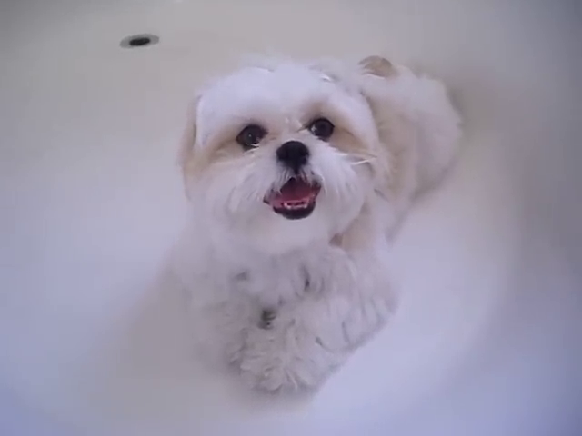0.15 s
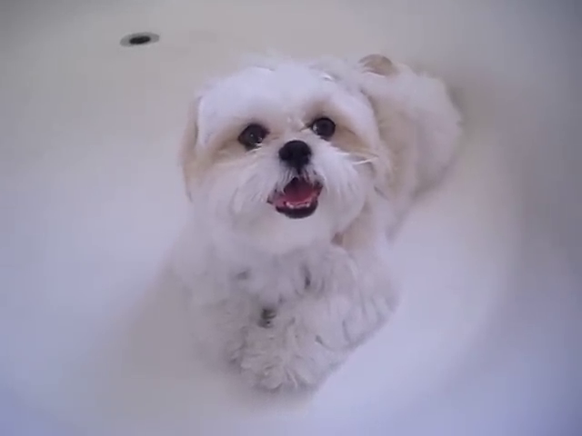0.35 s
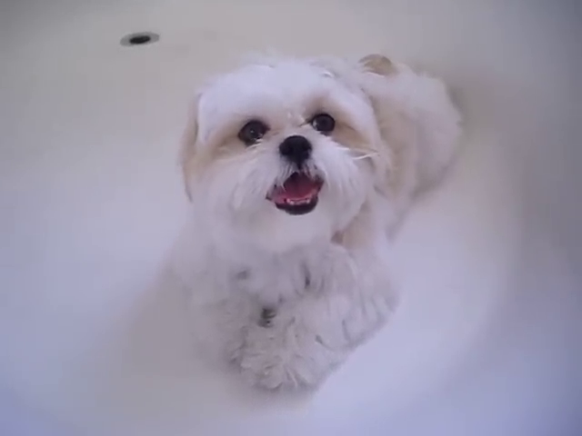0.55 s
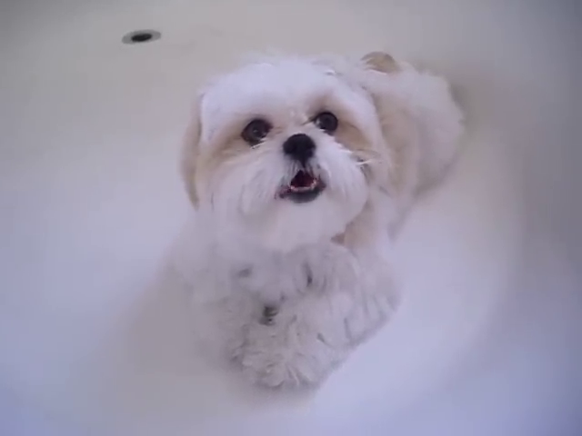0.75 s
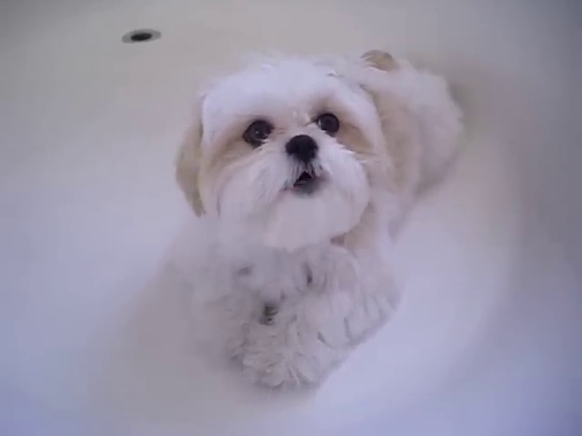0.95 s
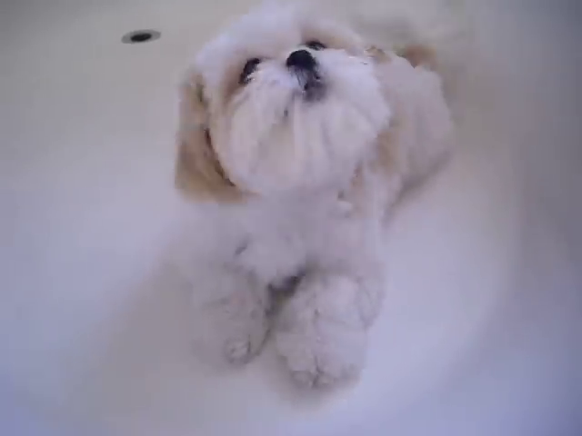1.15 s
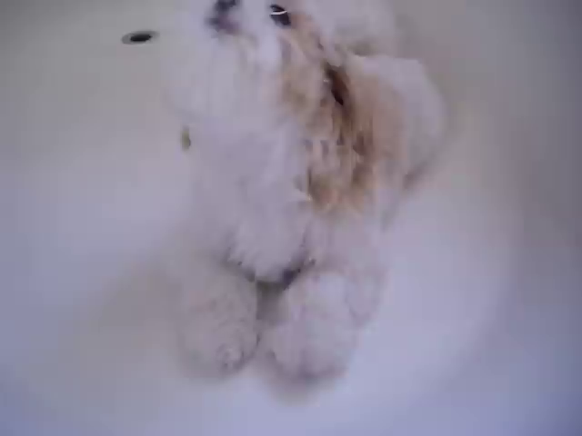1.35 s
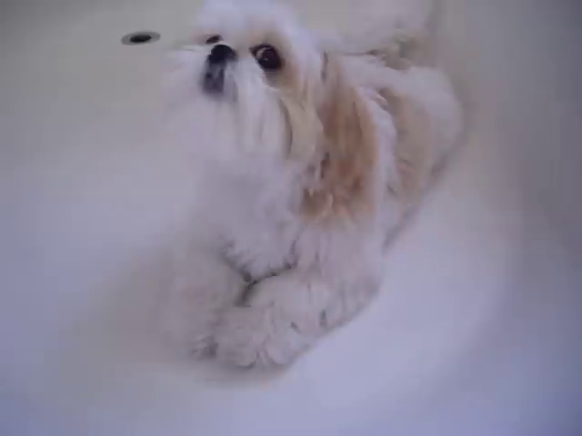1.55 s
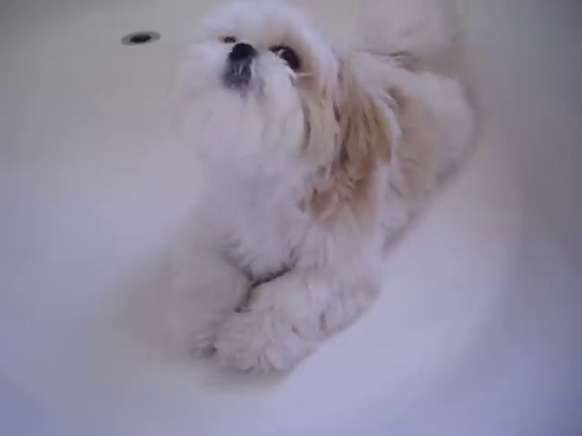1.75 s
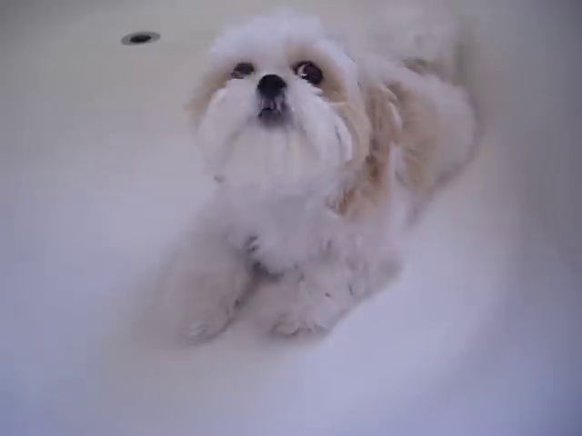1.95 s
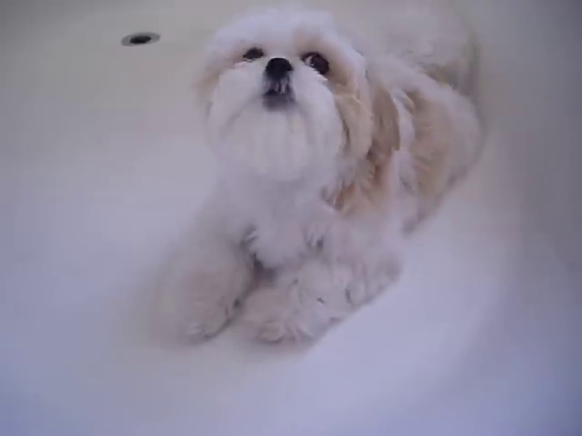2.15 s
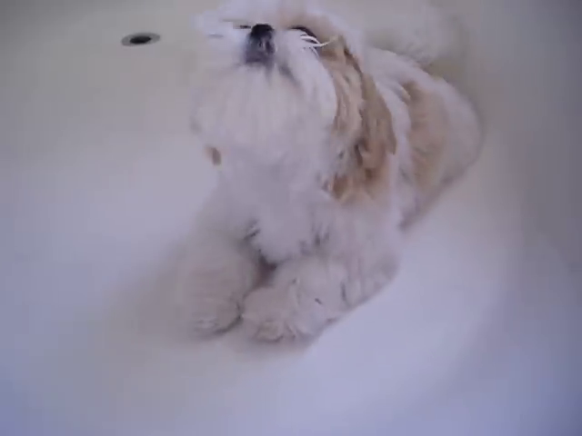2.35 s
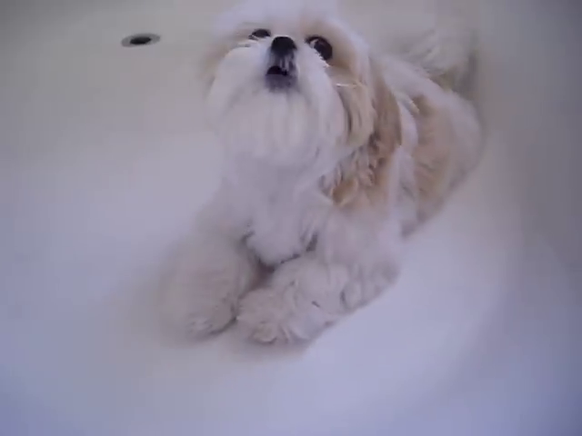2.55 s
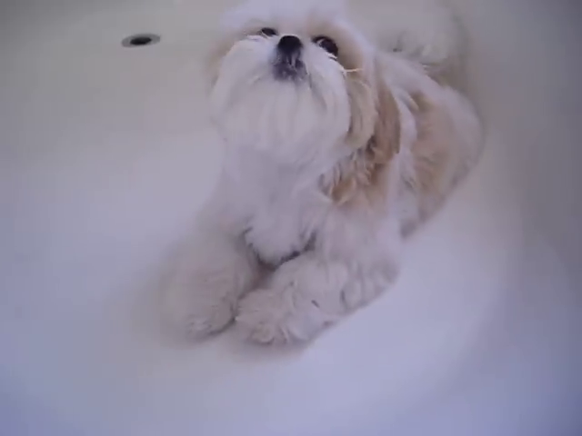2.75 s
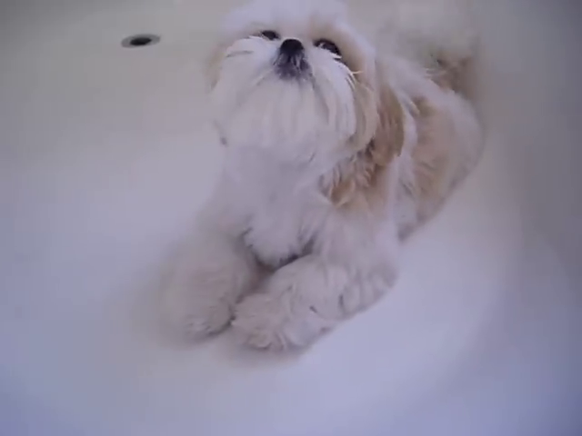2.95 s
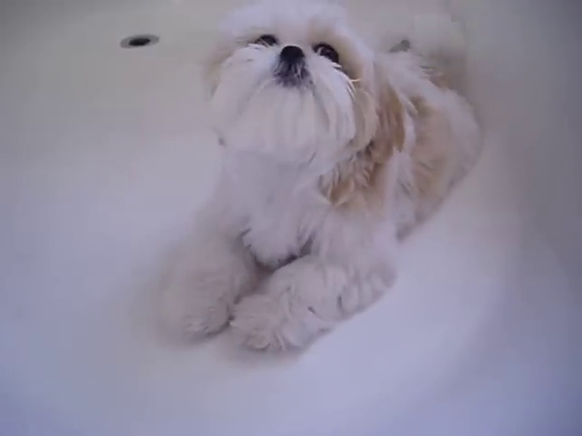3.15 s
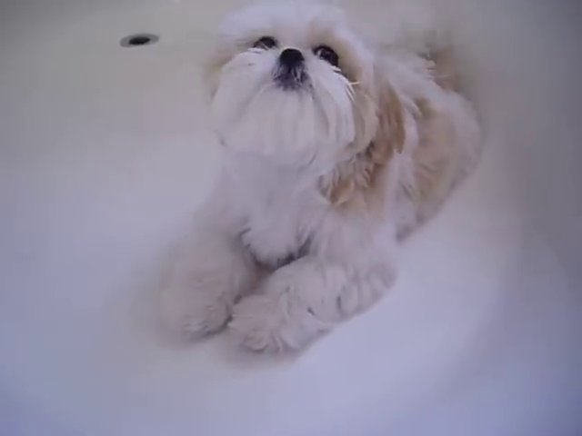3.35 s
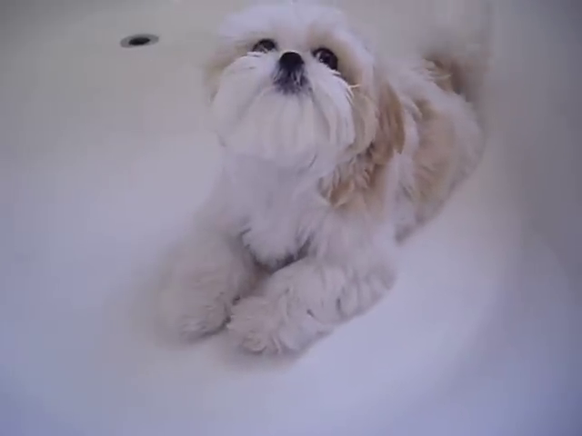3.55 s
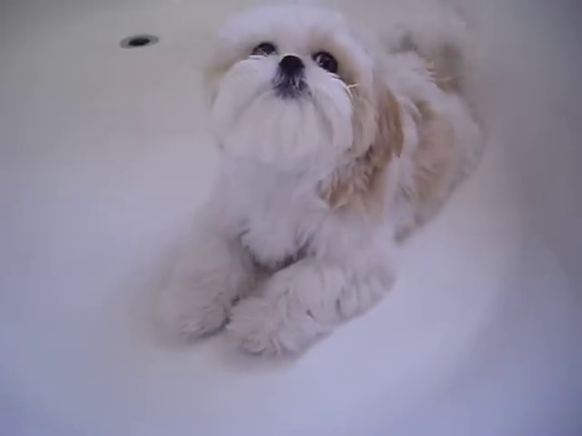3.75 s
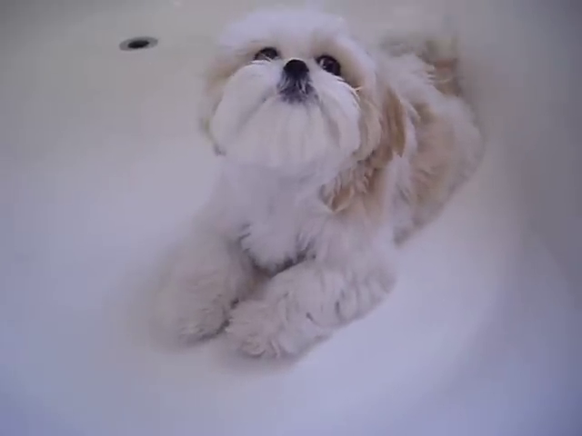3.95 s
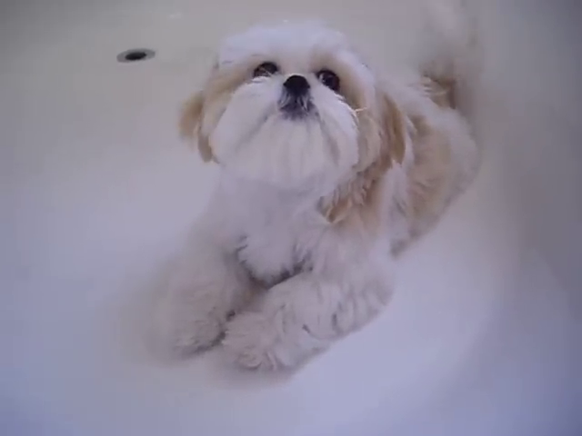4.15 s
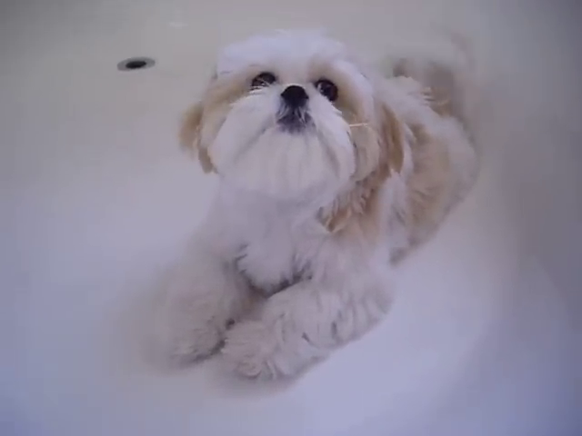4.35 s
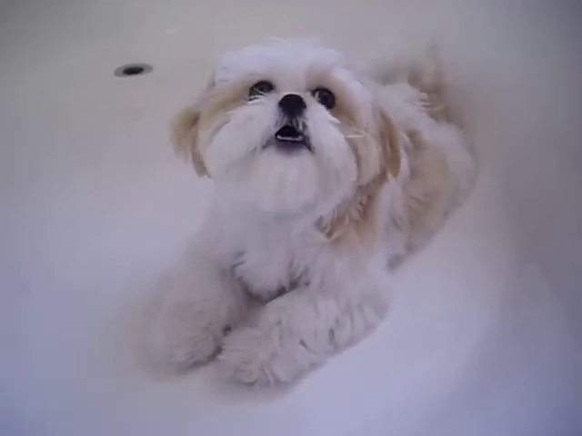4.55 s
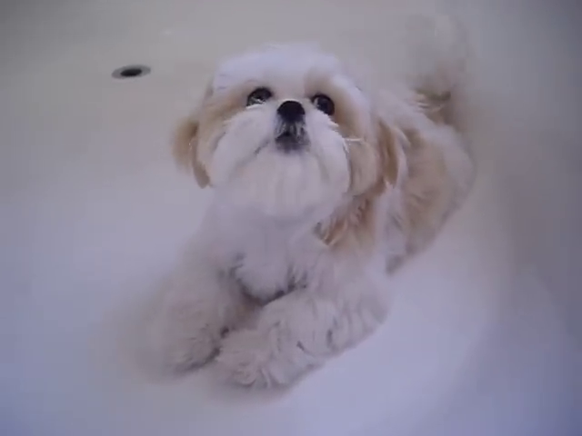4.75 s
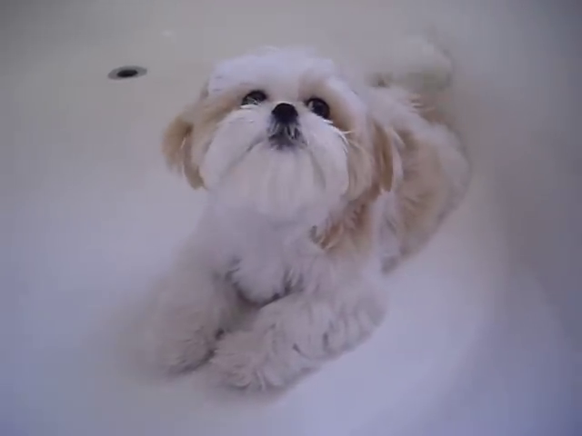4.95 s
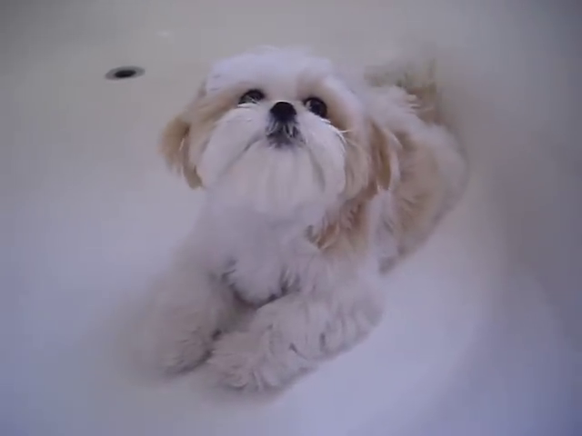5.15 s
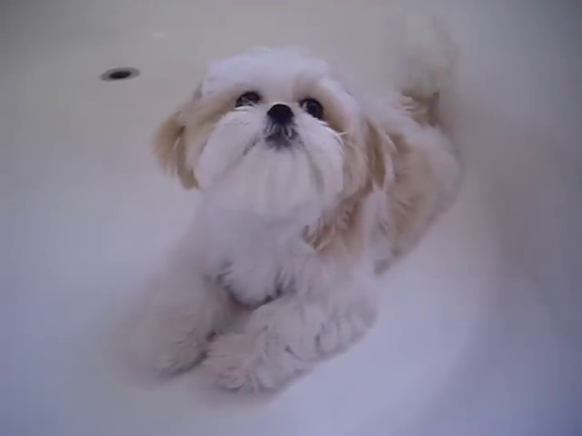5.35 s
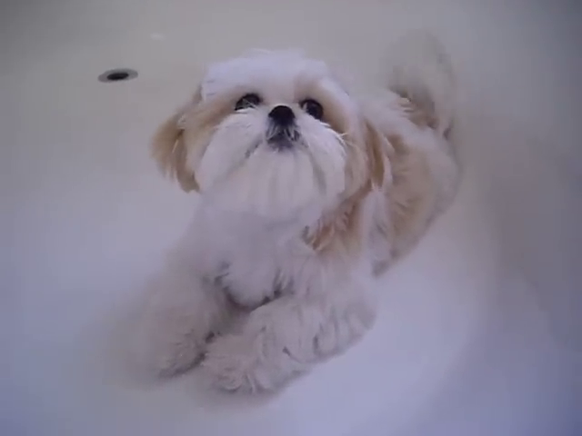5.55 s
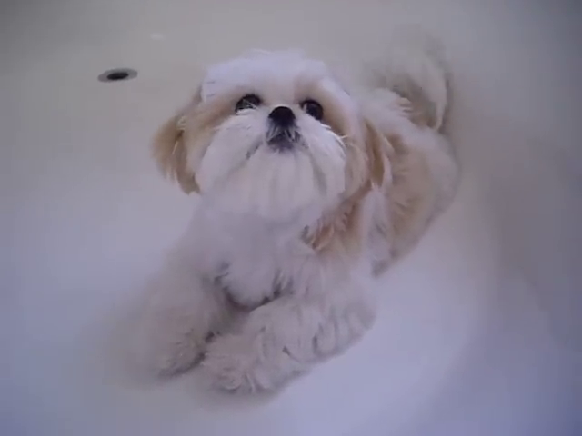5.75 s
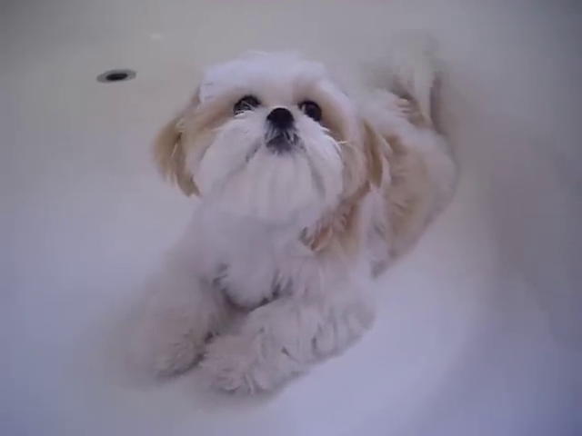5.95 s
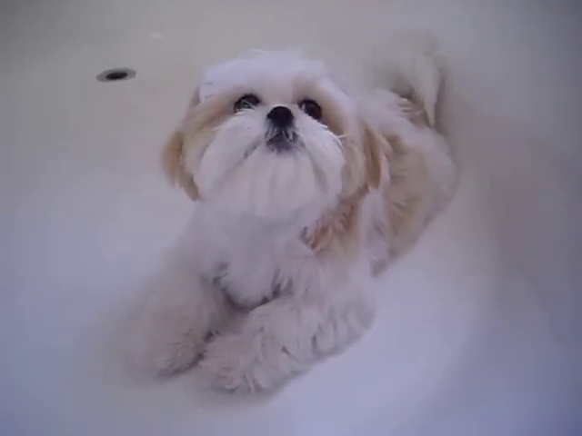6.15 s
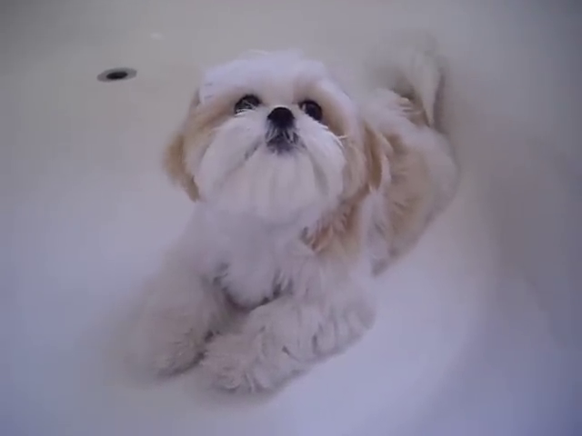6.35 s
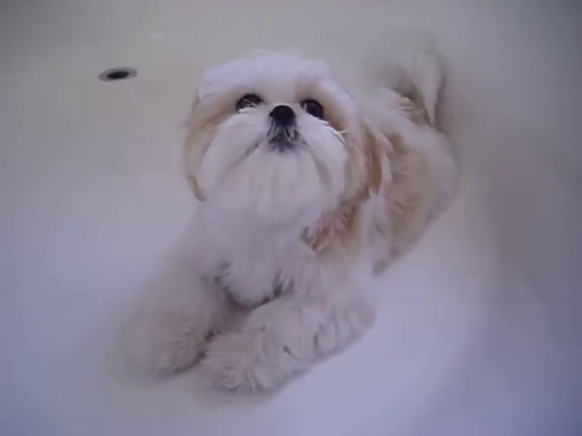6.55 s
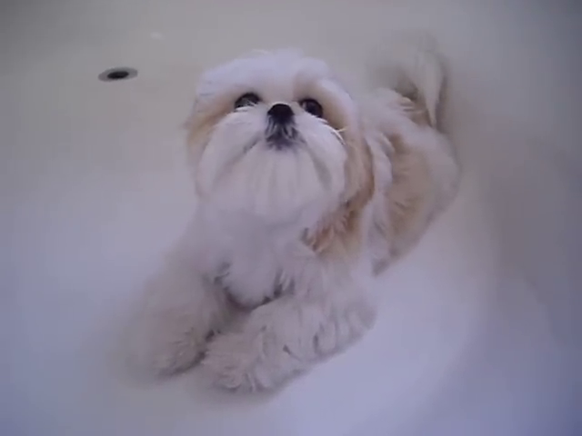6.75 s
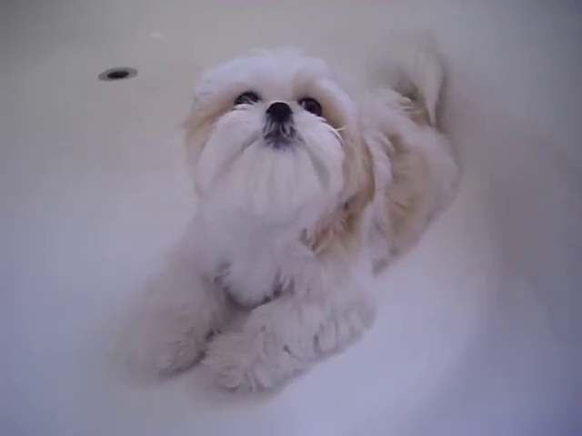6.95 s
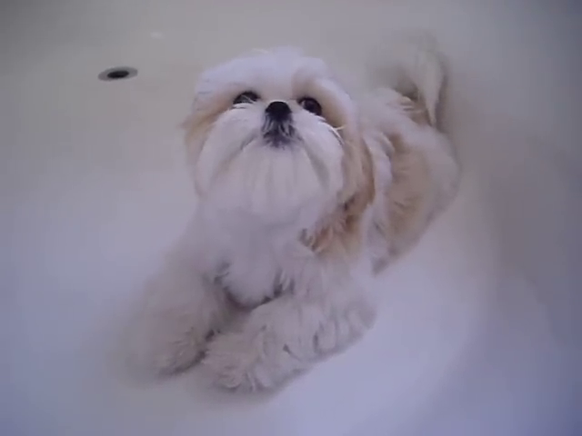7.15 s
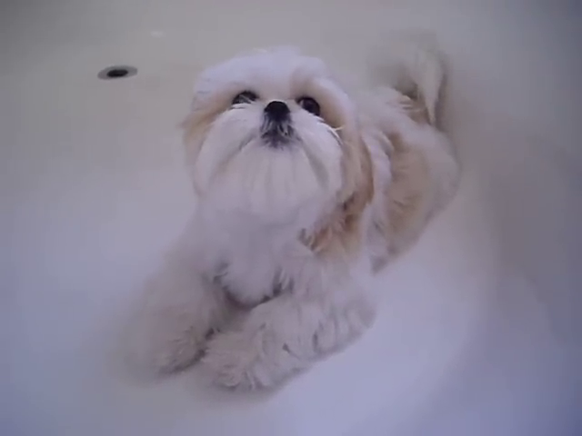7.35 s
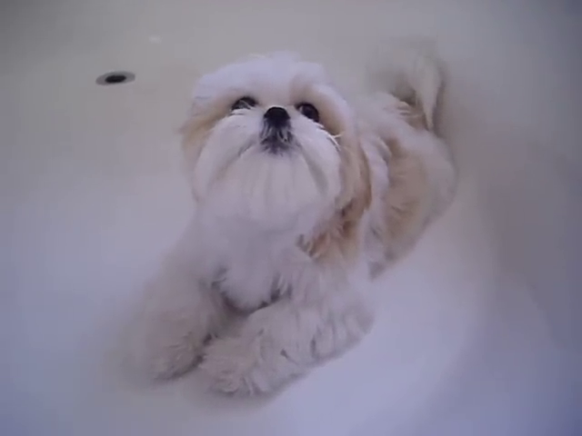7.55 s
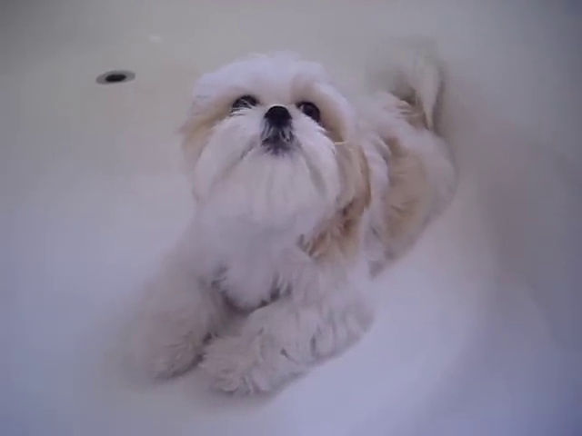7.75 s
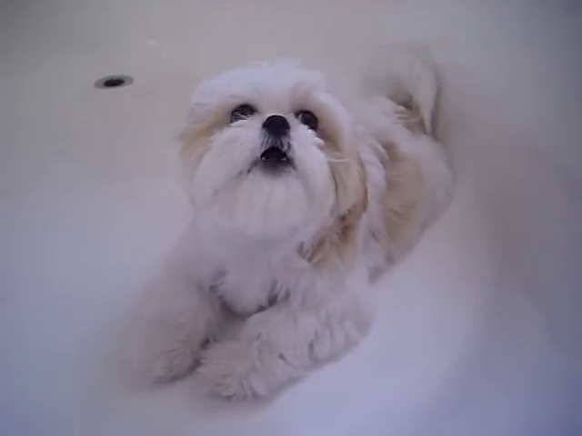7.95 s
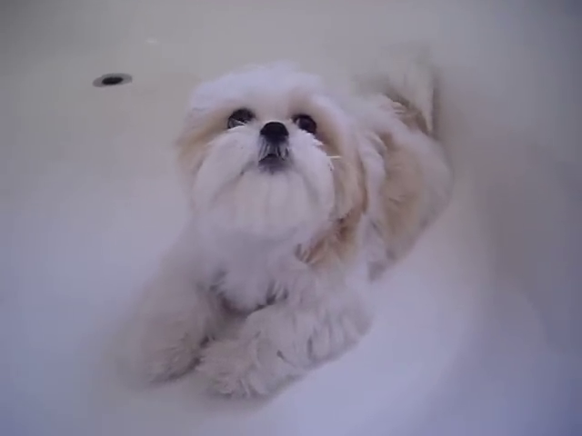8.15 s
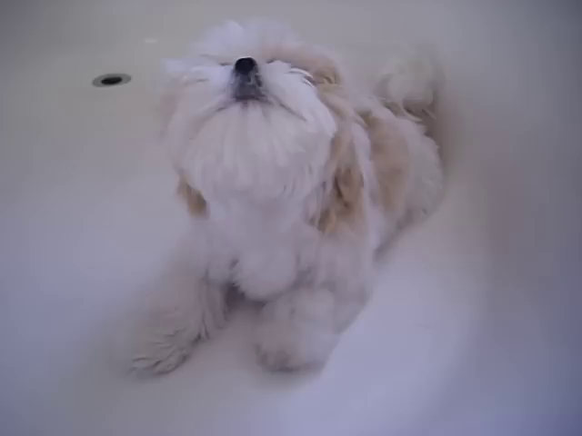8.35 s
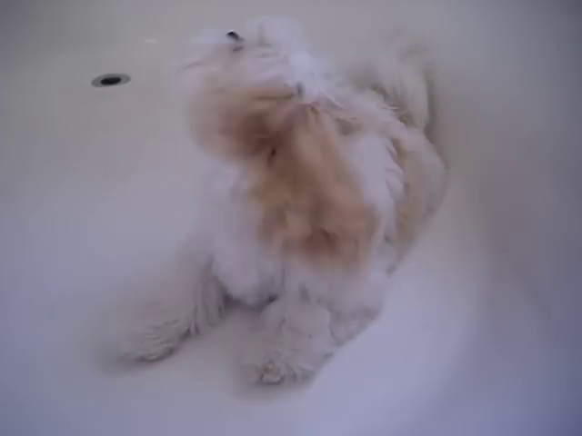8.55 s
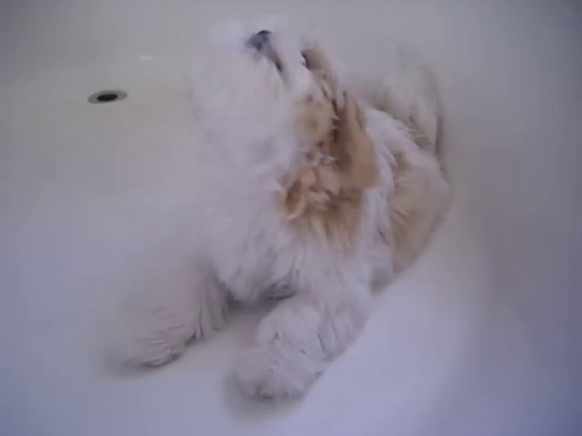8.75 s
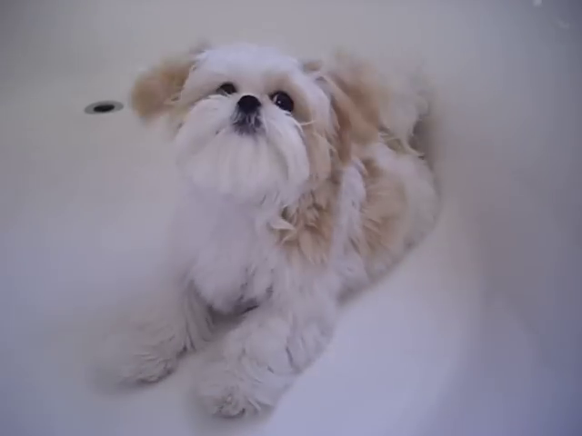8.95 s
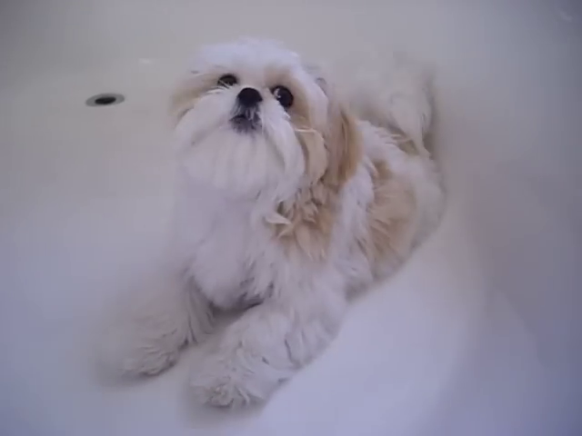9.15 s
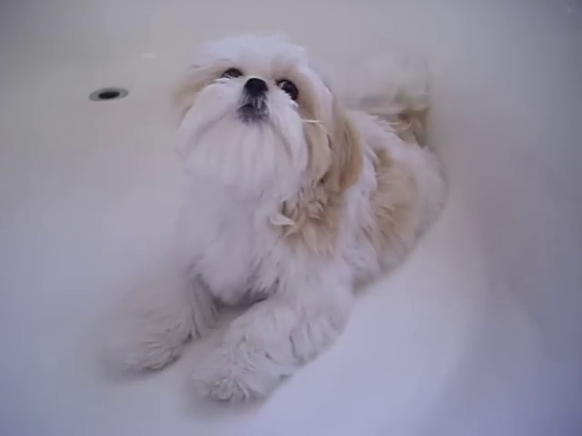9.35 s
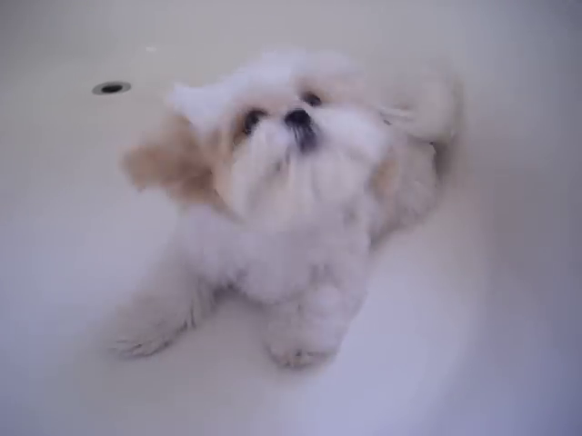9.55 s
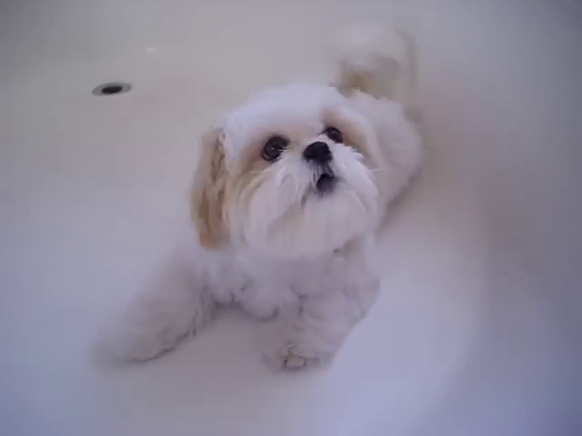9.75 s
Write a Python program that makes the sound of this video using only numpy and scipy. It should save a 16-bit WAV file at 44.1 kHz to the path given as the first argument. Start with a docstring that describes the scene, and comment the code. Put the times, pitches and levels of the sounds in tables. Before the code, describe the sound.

A small dog yaps sharply four times, growls softly for a long stretch, then yaps twice more, ringing in a tiled bathroom.

```python
"""Small dog in a bathtub

A small dog yaps four times, growls softly in a flutter, then yaps twice more, with a grumble between.
In a yap the vocal folds climb in pitch and break into a rasp; in a growl they slap in short, slack runs.
Sniffs, wet ticks and soft low bumps sit over a faint hush. The tub and the tiled room ring after each
yap, and the yaps overload the close microphone."""
import sys
import numpy as np
from scipy import signal
from scipy.io import wavfile
from scipy.ndimage import map_coordinates

SR = 44100
rng = np.random.default_rng(int(sys.argv[2]) if len(sys.argv) > 2 else 0)


def pcm_store(signal):
    """Save signal as 16-bit PCM."""
    levels = np.round(np.clip(np.atleast_2d(signal), -1, 1) * 32767)
    wavfile.write(sys.argv[1], SR, levels.astype(np.int16).T)


N = 432180


def amp(db):
    """Decibels to gain."""
    return 10 ** (np.asarray(db) / 20)


def unit(x):
    """Scales to rms 1."""
    return x / np.sqrt(np.mean(x ** 2) + 1e-20)


def curve_at(points, hz):
    """Reads a curve on a log-frequency axis."""
    points_hz, values = np.transpose(points)
    return np.interp(np.log(hz + 1), np.log(points_hz + 1), values)


def add(mix, start_s, sound):
    """Lays a sound into the mix."""
    part = mix[max(round(start_s * SR), 0):][:len(sound)]
    part += sound[:len(part)]


def band(x, lo_hz, hi_hz, order=2):
    """Band-pass."""
    return signal.sosfilt(signal.butter(order, [lo_hz, hi_hz], "band", fs=SR, output="sos"), x)


def low_pass(x, hz, taps):
    """Steep treble cut."""
    return signal.fftconvolve(x, signal.firwin(taps, hz, window=("kaiser", 9), fs=SR), "same")


def resonate(x, hz, width_hz):
    """One resonance of gain 1."""
    return signal.lfilter(*signal.iirpeak(hz, hz / width_hz, SR), x)


def colour(x, spectrum, shift=1, size=4096):
    """Minimum-phase EQ that follows the spectrum, its frequencies multiplied by shift."""
    hz = abs(np.fft.fftfreq(size, 1 / SR))
    log_gain = np.log(amp(curve_at(spectrum, hz / shift)))
    taps = np.fft.ifft(np.exp(np.conj(signal.hilbert(log_gain)))).real
    return signal.fftconvolve(x, taps[:size // 2])[:len(x)]


def moving_colour(x, spectrum, shift):
    """EQ that slides with the shift curve, by running on a stretched clock."""
    clock = np.cumsum(shift)
    steps = np.arange(clock[-1])
    stretched = np.interp(steps, clock, x)
    return np.interp(clock, steps, colour(stretched, spectrum))


def wander(n, hz):
    """Smooth random drift of rms 1, up to about hz."""
    knots = rng.standard_normal(int(n * hz * 2 / SR) + 2)
    return unit(map_coordinates(knots, [np.arange(n) * hz * 2 / SR], mode="nearest"))


# The tone of the quiet room. Each row: frequency in Hz, relative level in dB.
HUSH_EQ = [(15, -24.5), (25, 0), (45, -6), (103, -1.5), (143, -7), (297, -5), (511, -9), (660, -7),
           (1590, -13), (1870, -14.5), (5280, -17), (6080, -13), (7000, -18.5), (9100, -46), (15400, -120)]


def room_hush(level_db=-70):
    """A faint, steady bed of dark noise."""
    return amp(level_db) * unit(colour(rng.standard_normal(N), HUSH_EQ))


def reverb(x, t60s, delay_s, slot=20):
    """Sparse reflections of random sign, one per slot of samples; each band dies at its own speed."""
    echoes = np.zeros(SR)
    slots = np.arange(0, SR - slot, slot)
    echoes[slots + rng.integers(0, slot, len(slots))] = rng.choice([-1, 1], len(slots))
    hz, t, bands = signal.stft(echoes, SR, nperseg=256)
    decay = amp(-60 * t / curve_at(t60s, hz)[:, None])
    response = signal.istft(bands * decay, SR)[1]
    response = np.pad(response / np.linalg.norm(response), (int(delay_s * SR), 0))
    return signal.fftconvolve(x, response)[:N]


# What the tiles throw back. Each row: frequency in Hz, gain in dB.
TILE_EQ = [(100, -7), (300, -4), (490, -7), (600, 2), (1000, -1.5), (1600, 0.5), (2800, 1.5), (6000, 1)]
# The tiled room's tail. Each row: frequency in Hz, seconds to fall 60 dB.
ROOM_DECAY = [(150, .35), (600, 0.48), (1000, 0.48), (1600, 0.36), (2800, 0.37), (6000, 0.31)]
# Standing waves between the tub's sides. Each row: frequency in Hz, width in Hz, gain in dB.
STANDING_WAVES = [(580, 7, -13.5), (630, 7, -9), (872, 7, -14), (920, 2.4, -15), (970, 5, -14.5),
                  (1008, 7.6, -13.5), (1155, 8, -15), (1281, 13, -10.5), (2672, 12, -15), (2778, 12, -19)]


def bathroom(x, tub_db, room_db, standing_db, tub_t60=.17):
    """The direct sound, quick echoes in the tub, its standing waves and the longer ring of the tiles."""
    reflected = colour(x, TILE_EQ)
    tub = reverb(reflected, [(100, tub_t60), (7000, tub_t60)], delay_s=.004)
    standing = sum(amp(db) * resonate(x, hz, width) for hz, width, db in STANDING_WAVES)
    room = reverb(reflected, ROOM_DECAY, delay_s=.014)
    return x + amp(tub_db) * tub + amp(standing_db) * standing + amp(room_db) * room


# The tones in a bump. Each row: frequency in Hz before detuning, gain in dB, seconds to fall 60 dB.
BUMP_MODES = [(94.5, -3.5, .2), (119, 6.5, .16), (205, -4, 0.17), (245, -3.5, 0.61)]
# Soft low bumps and low ringing after the yaps. Each row: start in seconds, level in dB.
LOW_BUMPS = [(1.209, -55.5), (1.575, -58), (8.503, -44), (8.869, -59.5), (9.611, -45.5), (9.68, -57)]


def low_bump(start_s, level_db, attack_s=.004):
    """A soft onset and a short low ring, tuned a little differently each time."""
    t = np.arange(SR // 3) / SR
    ring = sum(amp(db - 60 * t / t60) * np.sin(2 * np.pi * hz * rng.uniform(.82, 1.04) * t)
               for hz, db, t60 in BUMP_MODES)
    return start_s, amp(level_db) * ring * (1 - np.exp(-t / attack_s))


# Lips and claws. Each row: start in seconds, peak level in dB, resonance in Hz, its width in Hz.
WET_TICKS = [(.07, -57, 5000, 1500), (.772, -54, 4690, 2000), (2.822, -48, 470, 250),
             (3.464, -64, 4500, 3000), (3.6, -58, 4004, 4020), (3.723, -49, 4200, 3000),
             (4.009, -43.5, 4200, 3500), (7.274, -54, 2400, 1200), (7.514, -50, 2166, 89.4)]


def wet_tick(start_s, peak_db, hz, width_hz, decay_s=.0046):
    """A tiny snap of noise through one resonance."""
    t = np.arange(SR // 10) / SR
    snap = rng.standard_normal(len(t)) * np.exp(-t / decay_s)
    ring = resonate(snap, hz, width_hz)
    return start_s, amp(peak_db) * ring / abs(ring).max()


# Quick sniffs. Each row: centre and length in seconds, level in dB, relative hiss and whistle in dB.
SNIFFS = [(0.972, 0.14, -61.5, -8.5, -10.5), (4.018, 0.058, -59.5, 1, -21), (4.81, 0.13, -64.5, -2, -14),
          (4.962, .06, -67, 0, -15), (8.11, .3, -71.5, -8, -1), (8.978, .2, -73, 6.5, -15.5),
          (9.382, 0.14, -68.5, -10, -6)]


def sniff(centre_s, length_s, level_db, hiss_db, whistle_db, whistle_hz=1170, width_hz=70):
    """Air drawn through the dog's nose: a hollow note, a thin hiss and a faint whistle."""
    n = int(length_s * SR)
    air = rng.standard_normal(SR)[:n]
    hollow = unit(band(air, 850, 1400))
    hiss = amp(hiss_db) * unit(band(air, 2400, 5100))
    whistle = amp(whistle_db) * unit(resonate(resonate(air, whistle_hz, width_hz), whistle_hz, width_hz))
    return centre_s - length_s / 2, amp(level_db) * (hollow + hiss + whistle) * np.hanning(n)


def fold_slaps(flutter_hz, slap_hz, push_db, slip, uneven_db):
    """Slack folds slap in one short run per flutter; returns a plain and an accented pulse train."""
    n = len(flutter_hz)
    flutters = np.floor(np.cumsum(flutter_hz) / SR + .75)
    starts = np.flatnonzero(np.diff(flutters))[:, None]
    nth = np.arange(7)  # slaps in a run
    chance = rng.standard_normal((SR // 200, 4, len(nth)))[:len(starts)]
    gap_luck, start_luck, level_luck, length_luck = chance.swapaxes(0, 1)
    delay_s = (nth + np.cumsum(slip * gap_luck, 1)) / slap_hz[starts] + .00182 * start_luck[:, :1]
    delay_s += .00397 * (nth // 4)  # a run stumbles after its fourth slap and starts afresh
    at = np.clip(starts + (delay_s * SR).astype(int), 0, n - 1)
    # a run holds longer the harder the dog pushes, then loses 7 dB a slap
    full_slaps = np.maximum(3.9 + .5 * push_db[starts] + length_luck[:, :1], 2)
    fade_db = -7 * np.maximum(nth + 1 - full_slaps, 0)
    slaps, snaps = np.zeros((2, n))
    slaps[at] = -amp(uneven_db * level_luck + fade_db)
    snaps[at] = slaps[at] * amp(-8 * (nth % 2) - 3.5 * (nth % 4))  # accents on the first and third of four
    return slaps, snaps


# The low hum that rings on under the growl. Each row: frequency in Hz, width in Hz, gain in dB.
HUM_MODES = [(100, 62, -7), (184.3, 5, 4.5), (214.3, 4, -0.5), (241.5, 12.4, 6.5)]
# Broad resonances of the nose and of the mouth. Each row: frequency in Hz, gain in dB.
NOSE_EQ = [(25, -43), (60, -31), (95, -3), (150, -13.5), (290, 1), (345, -3.5), (425, 2.5), (505, -5.5),
           (580, 1.5), (760, -28), (1400, -41.5)]
MOUTH_EQ = [(500, -39.5), (850, 0), (1050, 2.5), (1250, -5), (1550, -13.5), (1900, -25), (3000, -55)]
# Two long, soft growls, a list of breakpoints each. Each row: time in seconds, level in dB,
# flutters per second, slaps per second within a flutter, relative level of the low hum in dB.
GROWLS = [
    [(2.9, -71, 22.7, 195, 3), (3.03, -58.5, 26.4, 200, -4), (3.14, -56.5, 22.2, 204, -5),
     (3.45, -56.5, 22.7, 173, -4.5), (3.88, -55.5, 26.7, 203, -9), (4, -54.5, 19.6, 184, -2),
     (4.1, -59, 17.3, 195, -3), (4.36, -64.5, 20, 186, 0), (4.42, -71.5, 29, 193, -3)],
    [(4.895, -50.5, 36.3, 147, -7), (4.97, -51, 25, 189, -15), (5.13, -51.5, 25.5, 187, -15),
     (5.24, -57, 22.4, 200, -11), (5.3, -51.5, 25.3, 165, -12), (5.6, -51.5, 17.3, 170, -10.5),
     (6.02, -55.5, 20.8, 198, -4), (6.4, -56.5, 22.9, 205, -5.5), (6.66, -53.5, 25.6, 218, -4.5),
     (6.8, -56, 20.5, 194, -1.5), (7.14, -53, 23.9, 208, -6), (7.42, -54.5, 22.8, 213, -2.5),
     (7.64, -54, 23.2, 195, -5), (7.75, -53.5, 15.7, 177, -2), (7.83, -66.5, 24.8, 190, -4)],
]
# The grumble that trails the fifth yap, with rows as in a growl.
GRUMBLE = [(8.5, -46.5, 29.3, 200, -6), (8.66, -47, 27, 200, -12), (8.81, -47.5, 26, 200, -18),
           (8.91, -53.5, 26.4, 200, -19), (8.95, -65, 24, 200, -9), (9.03, -74, 23, 170, 1)]


def growl(rows, breath, opening=1, slip=.112, uneven_db=.7, easy_db=-53):
    """The fluttering folds ring nose and mouth over a low hum; opening shifts nose and mouth upward."""
    times, *columns = np.transpose(rows)
    t = np.arange(times[0], times[-1], 1 / SR)
    level_db, flutter_hz, slap_hz, hum_db = (np.interp(t, times, column) for column in columns)
    push_db = level_db - easy_db
    slaps, snaps = fold_slaps(flutter_hz, slap_hz, push_db, slip, uneven_db)
    air = breath * rng.standard_normal(N)[:len(t)]
    ring = sum(amp(db) * resonate(slaps, hz, width) for hz, width, db in HUM_MODES)
    hum = amp(hum_db) * unit(band(ring, 92, 377))
    nose = amp(-.9) * unit(colour(slaps + air, NOSE_EQ, opening))
    # the lips stay nearly shut, so the mouth's share shrinks as the growl swells
    mouth = amp(-10 - .4 * push_db) * unit(colour(snaps + air, MOUTH_EQ, opening))
    return times[0], amp(level_db) * (hum + nose + mouth) * signal.windows.tukey(len(t), .005)


def yap_gesture(hum_s, length_s, crest, peak_db, top_hz, onset_rough):
    """Effort, pitch and roughness of one yap: a shut-mouthed hum, an open-mouthed arch, a steady fade."""
    hum_db, swell_db, fade_db_per_s = -58.5, 16.5, 659.5
    opening_s, release_s = .016, .06
    open_hz, hum_hz_per_s, climb_hz_per_s, drop_hz_per_s = 384, 5500, 5200, 3300
    t = np.arange(-hum_s, length_s + release_s, 1 / SR)
    before, during, after = np.minimum(t, 0), np.clip(t, 0, length_s), np.maximum(t - length_s, 0)
    shut = 1 - np.exp(before / opening_s)
    skew = np.log(.5) / np.log(crest)
    arch = abs(np.sin(np.pi * (during / length_s) ** skew)) ** .8
    open_db = peak_db - swell_db * (1 - arch)
    effort_db = shut * hum_db + (1 - shut) * open_db - fade_db_per_s * after
    reach_hz = top_hz - open_hz
    climb_hz = reach_hz * np.tanh(climb_hz_per_s * during / reach_hz)
    hz = open_hz + hum_hz_per_s * before + climb_hz - drop_hz_per_s * after
    # the rasp sets in 29 to 43 ms after the mouth opens and clears as the voice fades
    rough = np.interp(t, [.029, .043, length_s, length_s + release_s / 2], [onset_rough, .43, .43, .18])
    return effort_db, hz, rough


def vocal_folds(hz, rough, air, jitter=.14, doubling=.83):
    """A buzz of 16 harmonics; roughness shakes its pitch and level and trades tone for breath."""
    n = len(hz)
    cycles = np.cumsum(hz * (1 + jitter * rough * wander(SR, 170)[:n])) / SR
    buzz = unit(sum(np.cos(2 * np.pi * k * cycles) for k in range(1, 17)))
    buzz *= 1 + rough * wander(SR, 220)[:n]
    buzz *= 1 + doubling * rough * np.cos(np.pi * cycles)  # strong and weak cycles alternate
    breath = unit(air * (.4 + np.exp(-(cycles % 1) / .3)))  # air escapes once a cycle
    return (1 - rough) * buzz + rough * breath


# The open mouth's main and upper resonances. Each row: frequency in Hz, gain in dB.
THROAT_EQ = [(150, -40.5), (480, -31.5), (620, -11), (800, -4.5), (1020, -2.5), (1150, -4), (1290, -6),
             (1480, -23), (2200, -45), (4000, -77)]
UPPER_EQ = [(900, -30.5), (1650, -2.5), (2200, -8), (2550, -3.5), (2790, 1), (3150, -19), (4200, -23),
            (6600, -23.5)]
# The six yaps. Each row: when the mouth opens, the hum before that and the open length, all in seconds,
# crest as a share of the length, peak effort in dB, pitch it climbs toward in Hz, onset roughness from
# 0 to 1, mouth opening as a factor on the throat resonance, upper resonance in dB at an effort of 0 dB.
YAPS = [ (1.03, 0.0072, .1, .48, 6, 528.8, 0.68, 1.05, -17),
        (1.392, 0.015, 0.077, 0.54, 3, 589.2, 0.13, 1.013, -20.5),
        (1.830, .025, 0.098, 0.32, -1.47, 538.8, .28, .98, -21),
        (2.292, .029, 0.089, 0.29, -3.5, 645.4, .26, 0.95, -21),
        (8.339, .010, 0.082, 0.51, 3, 517.8, .45, 1.002, -20),
        (9.499, .015, 0.082, .47, 1.5, 580, 0.53, 1.006, -17)]


def yap(open_s, hum_s, length_s, crest, peak_db, top_hz, onset_rough, opening, upper_db):
    """The folds drive the opening mouth, brighter with effort; a low thud sits under the loudest part."""
    effort_db, hz, rough = yap_gesture(hum_s, length_s, crest, peak_db, top_hz, onset_rough)
    air, thud_noise = rng.standard_normal((2, SR))[:, :len(hz)]
    folds = vocal_folds(hz, rough, air)
    jaw = np.minimum(hz / 495, 1) ** .5  # wide open from 495 Hz up; below, the resonance sinks with pitch
    throat = unit(moving_colour(folds, THROAT_EQ, opening * jaw))
    upper = amp(upper_db + .13 * effort_db) * unit(colour(folds, UPPER_EQ))
    thud = amp(-40 + .9 * effort_db) * unit(band(thud_noise, 28, 200, order=1))
    # the fundamental leaks through the neck even while the mouth is nearly shut
    neck = amp(-34 + .17 * effort_db) * unit(band(folds, 230, 700, order=4))
    voice = amp(effort_db) * (throat + upper + thud) + neck
    return open_s - hum_s, voice * signal.windows.tukey(len(hz), .04)


def scene():
    """The dog in the tub, over the faint hush of the room."""
    loud, soft = np.zeros((2, N))
    for row in YAPS:
        add(loud, *yap(*row))
    # the mouth is still ajar after the yap
    add(loud, *growl(GRUMBLE, breath=.05, opening=1.184, slip=.19, uneven_db=-.5))
    for rows in GROWLS:
        add(soft, *growl(rows, breath=.013))
    for source, table in (sniff, SNIFFS), (wet_tick, WET_TICKS), (low_bump, LOW_BUMPS):
        for row in table:
            add(soft, *source(*row))
    hush = room_hush()
    # yaps aim up at the tiles, while the soft sounds stay low and close
    ringing = bathroom(loud, tub_db=-6.5, room_db=-14, standing_db=-.5)
    close = bathroom(soft, tub_db=-15, room_db=-19, standing_db=-26)
    return (ringing + close + hush)[None]


def overload(x, ceiling, hardness):
    """Flattens the peaks at the ceiling."""
    return x / (1 + abs(x / ceiling) ** hardness) ** (1 / hardness)


# The microphone chain's treble colour. Each row: frequency in Hz, gain in dB.
TREBLE_EQ = [(7000, 0), (8500, -2.5), (11000, 5.5), (13000, 5.5), (16000, 5.5)]


def record(dry):
    """The input squares off the yaps; a low-pass makes their flat tops ripple, and these clip again."""
    squared = overload(dry[0], ceiling=.71, hardness=7)
    rippled = low_pass(squared, 7250, taps=121)
    clipped = overload(rippled, ceiling=.7, hardness=80)
    return low_pass(colour(clipped, TREBLE_EQ), 15950, taps=511)[None]


dry = scene()
out = record(dry)
pcm_store(out)
```